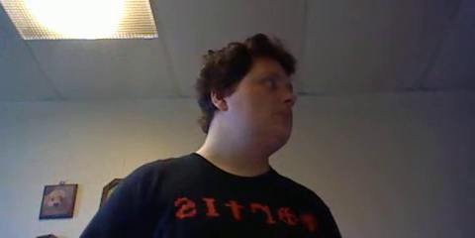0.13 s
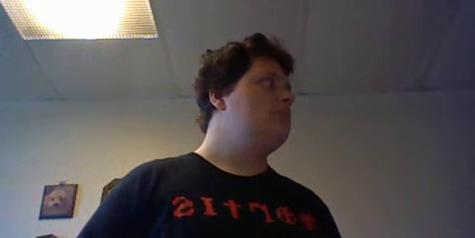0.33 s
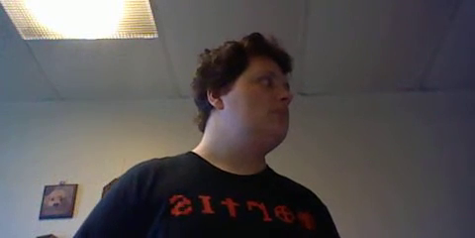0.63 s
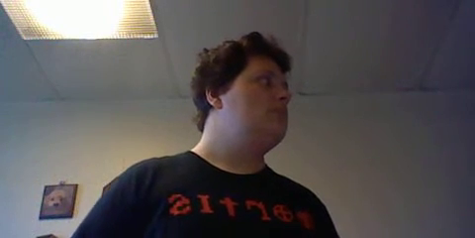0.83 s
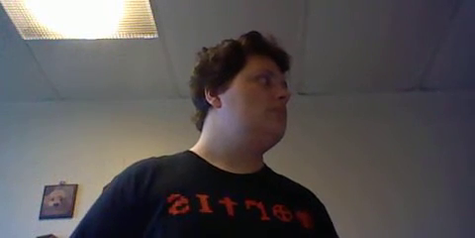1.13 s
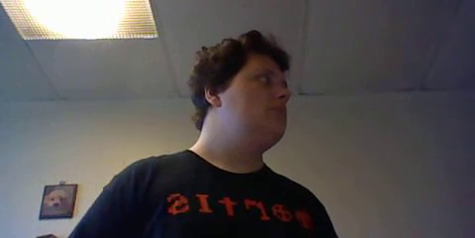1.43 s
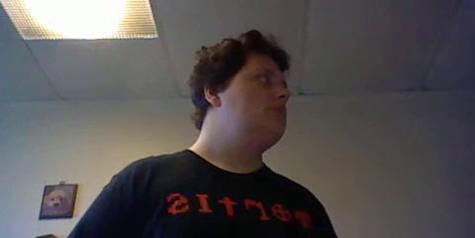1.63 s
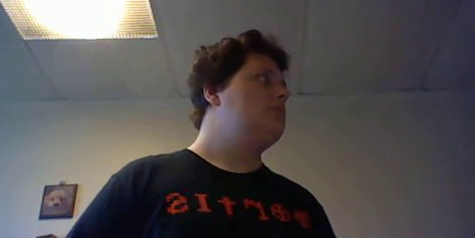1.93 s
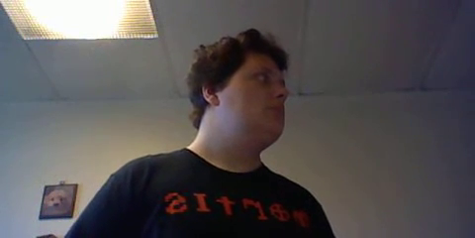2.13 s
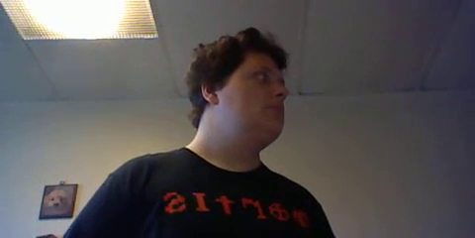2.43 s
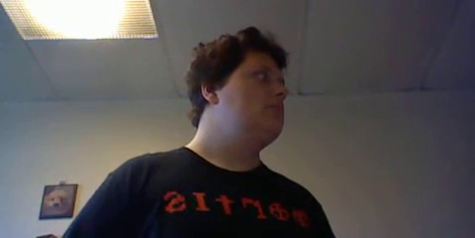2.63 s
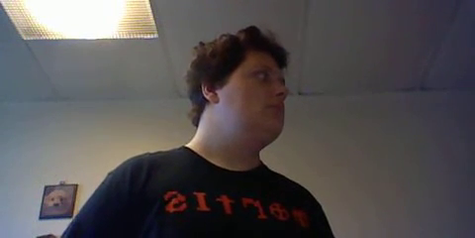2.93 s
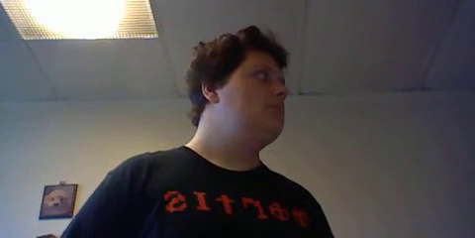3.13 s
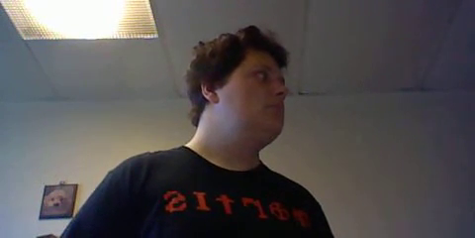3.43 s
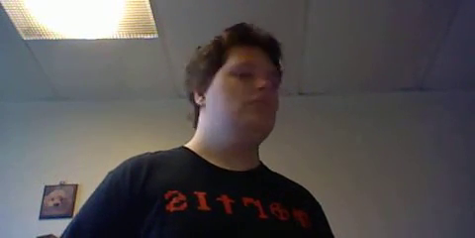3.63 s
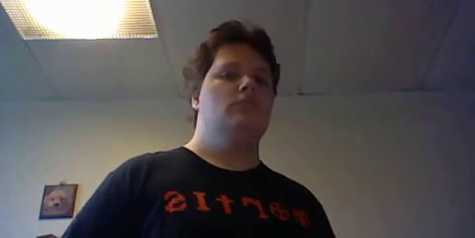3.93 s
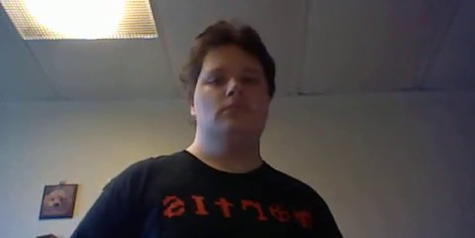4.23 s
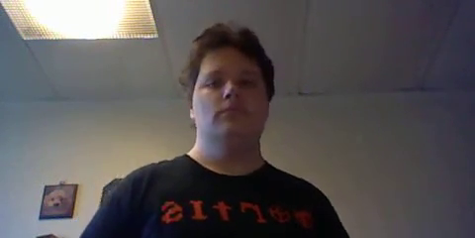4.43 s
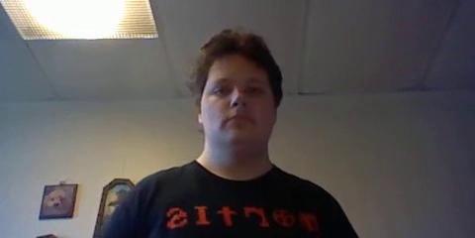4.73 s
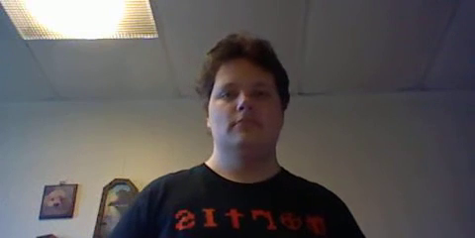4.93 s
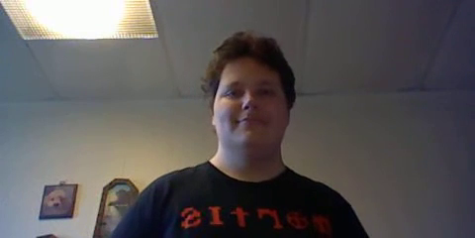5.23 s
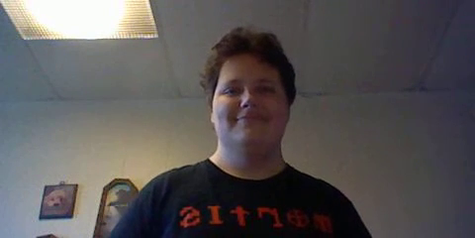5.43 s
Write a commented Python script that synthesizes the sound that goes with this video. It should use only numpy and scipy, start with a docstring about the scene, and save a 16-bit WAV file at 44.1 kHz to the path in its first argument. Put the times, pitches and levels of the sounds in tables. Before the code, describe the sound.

A microwave oven is already running in a kitchen, a few steps from a small computer microphone, and it keeps going for the whole five and a half seconds. Its low electric hum has a slight buzz. The fan drones along with it, pulsing gently against the hum and pushing a soft, slightly hollow rush of air through the case. Other appliance motors add faint steady tones and a low throb, about two beats a second. At about 2 seconds a deep room rumble swells briefly, followed by a swell in a deep drone that lasts until about 3 seconds. The throb grows stronger around 4 seconds, eases just before 5 seconds, and rises again at the end. A faint, fluttering microphone hiss stays underneath throughout.

```python
"""A microwave oven runs in a kitchen, a few steps from a small computer microphone.
From the start its transformer hums; a four-blade fan drones, beats against the hum and blows air
through the case. Other motors throb low in the room; the microphone adds faint fluttering hiss.
From 2 to 3 s the room's rumble and drone swell briefly. The throb rises near 4 s and at the end."""
import sys
import numpy as np
from scipy.fft import rfft, irfft, next_fast_len
from scipy.io import wavfile
from scipy.ndimage import map_coordinates

SR = 44100
rng = np.random.default_rng(int(sys.argv[2]) if len(sys.argv) > 2 else 0)


def master_out(mix):
    """Clip the mix to full scale and print it as 16-bit PCM to the path in sys.argv[1]."""
    frames = np.transpose(np.atleast_2d(mix))
    ceiling = np.clip(frames, -1, 1)
    pcm = np.round(ceiling * 32767).astype(np.int16)
    wavfile.write(sys.argv[1], SR, pcm)


N = 245195
MAINS_HZ = 59.95
# Swells of the room's low sounds: crest_s, width_s, rumble_lift_db, drone_lift_db
SWELLS = [(1.967, 0.24, 10, 1), (2.652, 0.37, 5, 6.5), (3.023, 0.14, 1, 5)]


def amp(db):
    """Decibels to gain."""
    return 10 ** (np.asarray(db) / 20)


def unit(x):
    """x at rms 1."""
    return x / np.sqrt(np.mean(x ** 2) + 1e-20)


def clock():
    """Sample times in seconds."""
    return np.arange(N) / SR


def along(points, hz):
    """(hz, value) points joined on a log frequency axis."""
    knots_hz, values = np.transpose(points)
    return np.interp(np.log(hz + 1), np.log(knots_hz + 1), values)


def curve(points):
    """(time_s, value) points joined, one value per sample."""
    return np.interp(clock(), *np.transpose(points))


def bell(x, centre, width):
    """Hump of height 1; width is taken at half height."""
    return 2 ** -((2 * (x - centre) / width) ** 2)


def wobble(rate_hz):
    """Smooth random curve with knots at rate_hz."""
    knots = rng.standard_normal(int(N * rate_hz / SR) + 4)
    return map_coordinates(knots, [clock() * rate_hz])


def filtered(x, gain):
    """x with its spectrum scaled by gain(hz)."""
    size = next_fast_len(N + SR // 2)
    hz = np.fft.rfftfreq(size, 1 / SR)
    return irfft(rfft(x, size) * gain(hz), size)[:N]


def noise(density):
    """Noise with density(hz) in dB per Hz."""
    white = rng.standard_normal(N) * np.sqrt(SR / 2)
    return filtered(white, lambda hz: amp(density(hz)))


def tone(turns):
    """Sinusoid of rms 1 from its phase in turns."""
    return np.sqrt(2) * np.cos(2 * np.pi * turns)


def transformer(lag_turns, shimmer_db=0.53):
    """The core flexes with the mains and shakes the panels; even multiples carry the hum."""
    # Core harmonics: mains_multiple, level_db
    harmonics = [(1, -43), (2, -38), (3, -57), (4, -43), (5, -64), (6, -54), (7, -63), (8, -70), (9, -72),
                 (10, -72), (11, -66), (12, -72), (14, -62), (15, -68), (16, -79), (17, -79), (19, -80),
                 (20, -78), (22, -78), (23, -78), (24, -82), (25, -79), (26, -79)]
    # Hum drift, applied about its mean: time_s, level_db
    drift = [(0, -37.5), (1, -38.5), (2.1, -39), (3, -38.5), (3.8, -37), (4.4, -37.5), (5.56, -37)]
    drift_db = curve(drift)
    hum = np.zeros(N)
    for multiple, level_db in harmonics:
        k = round(multiple)
        gain = amp(level_db + shimmer_db * wobble(4))
        hum += gain * tone(k * MAINS_HZ * clock() + lag_turns[k])
    return hum * amp(0.94 * (drift_db - drift_db.mean()))


def fan(lag_turns, shaft_hz=44.108, sway_turns=0.004, beat_crest_s=0.026):
    """The shaft sways; turbulence shakes high tones most. Each beats with the nearest hum harmonic."""
    # Fan tones, strongest at multiples of the four blades: shaft_multiple, level_db
    harmonics = [(2, -65), (3, -61), (4, -38.7), (8, -49.5), (10, -70), (12, -65.5), (16, -64.5), (17, -75),
                 (18, -70), (19, -62.5), (20, -58.5)]
    shaft_turns = shaft_hz * (clock() - beat_crest_s) + sway_turns * wobble(1.4)
    out = np.zeros(N)
    for multiple, level_db in harmonics:
        k = round(multiple)
        mains_multiple = round(k * shaft_hz / MAINS_HZ)
        hum_turns = mains_multiple * MAINS_HZ * beat_crest_s + lag_turns[mains_multiple]
        gust_db = 0.8 + 0.07 * k
        gusts = unit(amp(gust_db * wobble(18)))
        out += amp(level_db) * gusts * tone(k * shaft_turns + hum_turns)
    return out


def airflow(waver_db=0.28):
    """Air rushes through the fan, lifted at each resonance of the case."""
    # Rush spectrum: frequency_hz, density_db_per_hz
    spectrum = [(20, -85.5), (70, -75), (95, -68), (140, -68.5), (200, -77), (400, -79), (590, -86.5),
                (760, -80.5), (1100, -90), (1600, -93.5), (2700, -100), (4000, -103), (5500, -108),
                (8000, -120)]
    # Case and cooking chamber resonances: centre_hz, width_hz, lift_db
    resonances = [(160.4, 12, 9.5), (219, 40, 6.5), (320.4, 60, 7), (461, 54, 9), (517, 42, 6),
                  (676, 27, 0.5), (880, 89, 10), (1017, 30, 5), (1193, 32, 5.5), (1284, 43, 4),
                  (1397, 130, 3.5), (1727, 50, 7.5), (2083, 100, 6.5), (2437, 90, 5.5), (2790, 100, 3.5),
                  (3110, 160, 2.5)]

    def density(hz):
        lift_db = sum(db * bell(hz, centre_hz, width_hz) for centre_hz, width_hz, db in resonances)
        return along(spectrum, hz) + lift_db

    return noise(density) * amp(waver_db * wobble(9))


def induction_motor(mains_lag_turns, pitch_hz=57.7, beat_crest_s=0.28):
    """A motor, perhaps the fridge, slips behind the mains and beats with it about twice a second."""
    # Motor strength: time_s, level_db
    levels = [(0, -50.5), (1.1, -46), (2.2, -50), (3.2, -46.5), (3.9, -37.5), (4.3, -37), (4.8, -50),
              (5.56, -38)]
    slip_turns = (MAINS_HZ - pitch_hz) * (clock() - beat_crest_s)
    return amp(curve(levels)) * tone(MAINS_HZ * clock() + mains_lag_turns - slip_turns)


def room_rumble(base_db=-45.5):
    """Low noise, steady between swells."""
    # Rumble shape: frequency_hz, relative_db
    spectrum = [(5, -13), (13, 3), (26, 0.5), (36, -4.5), (46, -7), (56, -0.5), (70, -22.5), (150, -53),
                (400, -100)]
    lift_db = sum(db * bell(clock(), crest_s, width_s) for crest_s, width_s, db, _ in SWELLS)
    return amp(base_db + lift_db) * unit(noise(lambda hz: along(spectrum, hz)))


def room_drone(pitch_hz=47.65, base_db=-44, waver_db=0.4):
    """A deep tone that wavers and swells."""
    lift_db = sum(db * bell(clock(), crest_s, width_s) for crest_s, width_s, _, db in SWELLS)
    level_db = base_db + lift_db + waver_db * wobble(6)
    return amp(level_db) * tone(pitch_hz * clock() + rng.random())


def appliances():
    """Other appliances hold faint steady tones."""
    # Appliance tones: pitch_hz, level_db
    tones = [(59, -53), (79.9, -60), (100, -58), (164, -58), (284, -69), (674, -77), (708, -72),
             (869.7, -71), (1059, -79), (1770, -83)]
    return sum(amp(level_db) * tone(pitch_hz * clock() + rng.random()) for pitch_hz, level_db in tones)


def microphone_hiss(flutter_hz=354.04, depth=0.32):
    """Microphone noise with a fast, even flutter."""
    # Hiss spectrum: frequency_hz, density_db_per_hz
    spectrum = [(100, -104), (3500, -104), (5500, -104), (7400, -105.7)]
    flutter = unit(1 + depth * tone(flutter_hz * clock()))
    return noise(lambda hz: along(spectrum, hz)) * flutter


def scene():
    """Oven and room, mono."""
    lag_turns = rng.random(size=32)  # each mains multiple takes its own path through the room
    oven = transformer(lag_turns) + fan(lag_turns) + airflow()
    room = induction_motor(lag_turns[1]) + room_rumble() + room_drone() + appliances()
    return (oven + room)[None]


def record(dry, cutoff_hz=8900):
    """The microphone adds hiss; the top treble is cut off."""
    # Treble loss: frequency_hz, gain_db
    roll_off = [(7200, 0), (7600, -2), (8000, -5.5), (8500, -15), (8900, -33.5)]
    signal = dry[0] + microphone_hiss()
    return filtered(signal, lambda hz: amp(along(roll_off, hz)) * (hz < cutoff_hz))[None]


dry = scene()
out = record(dry)
master_out(out)
```